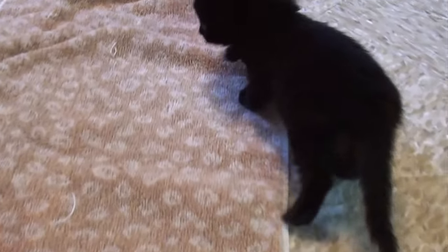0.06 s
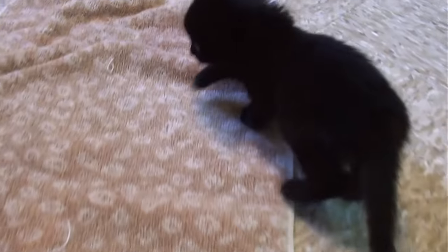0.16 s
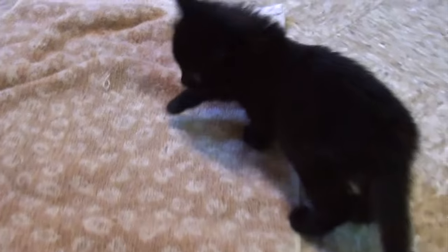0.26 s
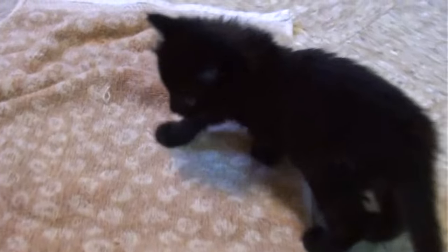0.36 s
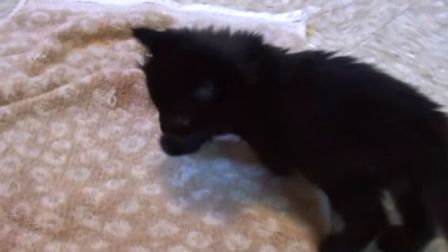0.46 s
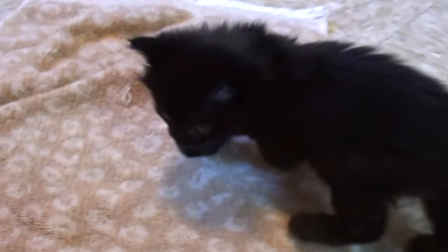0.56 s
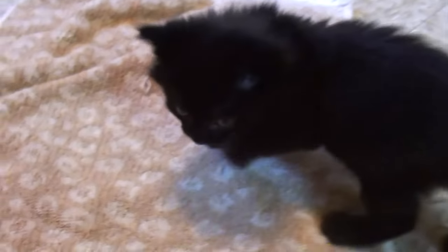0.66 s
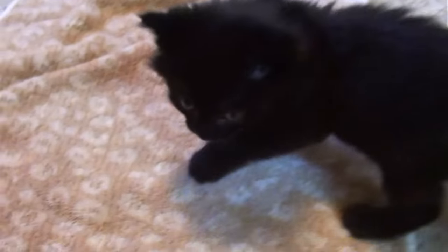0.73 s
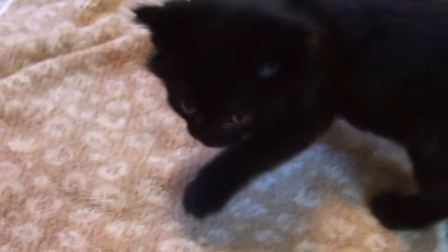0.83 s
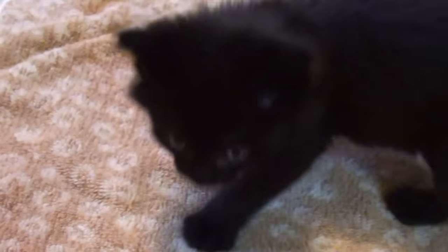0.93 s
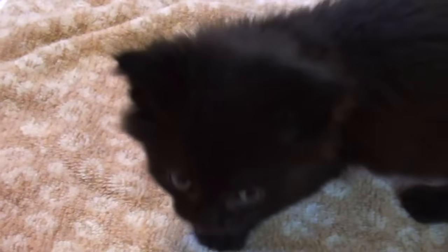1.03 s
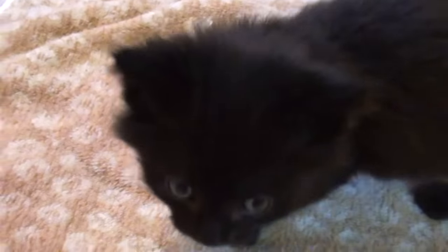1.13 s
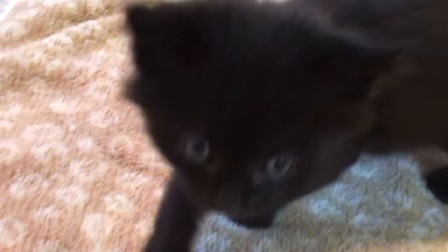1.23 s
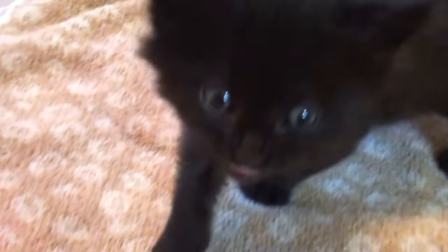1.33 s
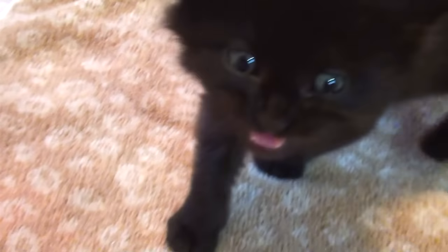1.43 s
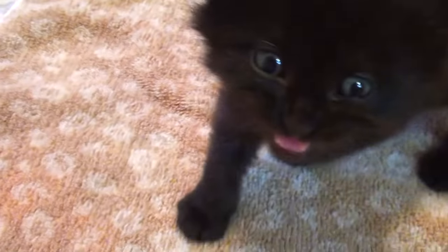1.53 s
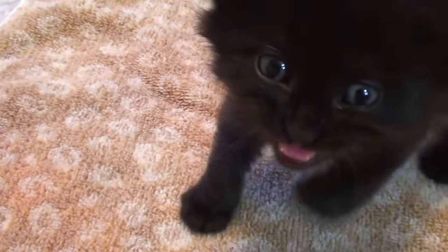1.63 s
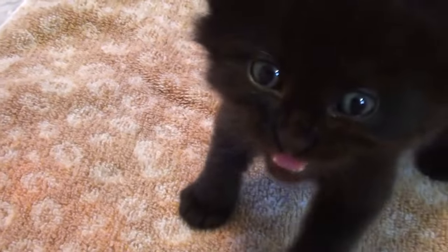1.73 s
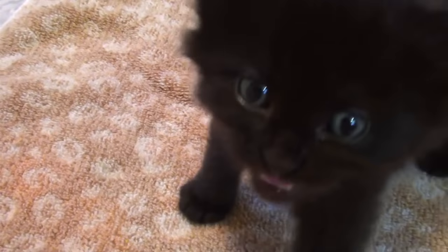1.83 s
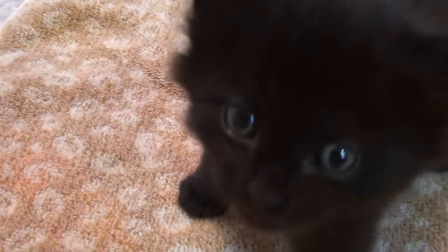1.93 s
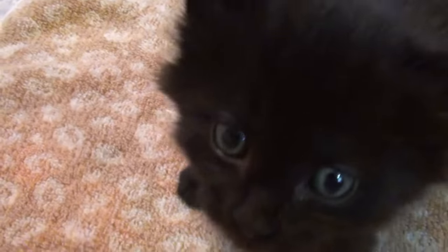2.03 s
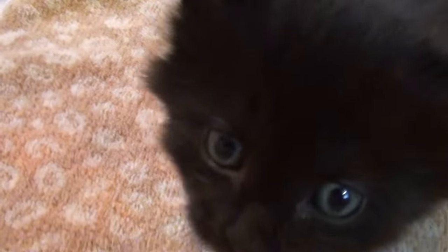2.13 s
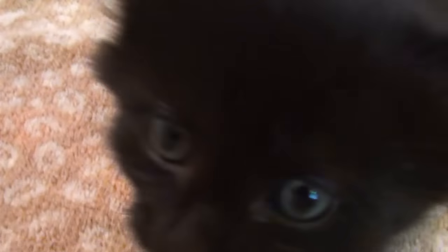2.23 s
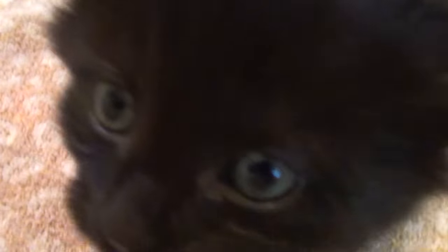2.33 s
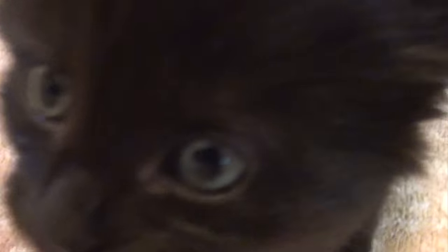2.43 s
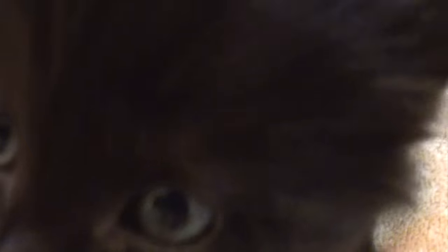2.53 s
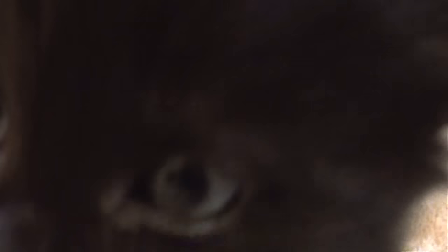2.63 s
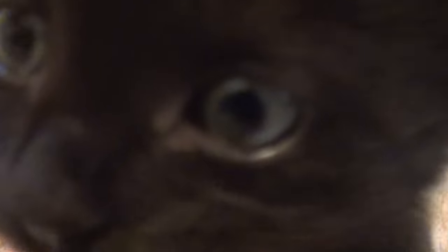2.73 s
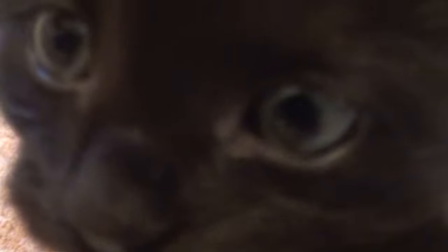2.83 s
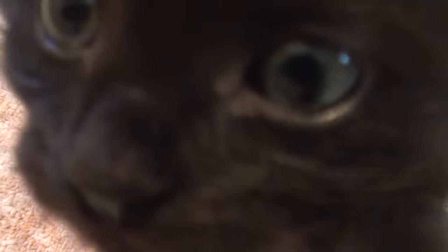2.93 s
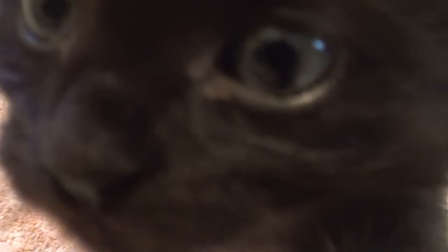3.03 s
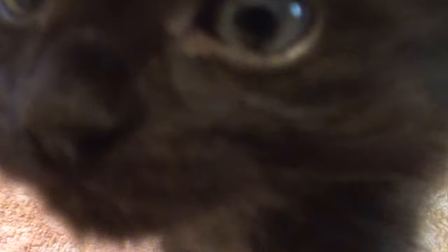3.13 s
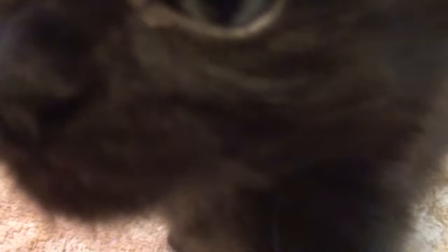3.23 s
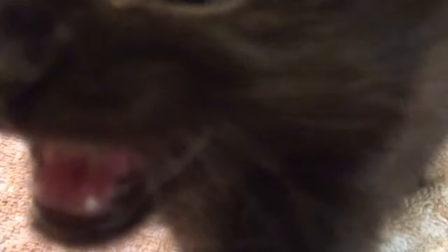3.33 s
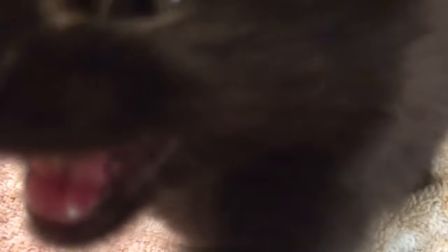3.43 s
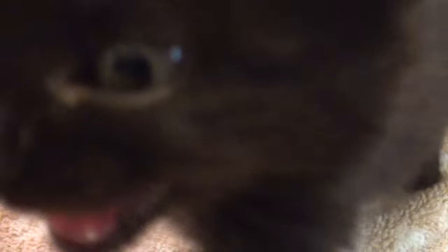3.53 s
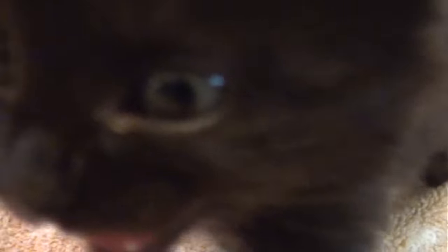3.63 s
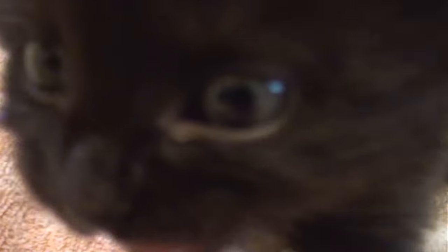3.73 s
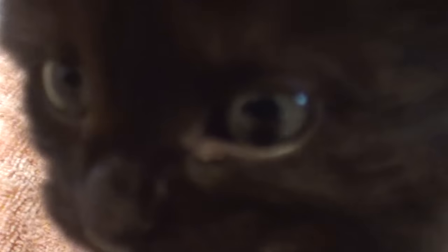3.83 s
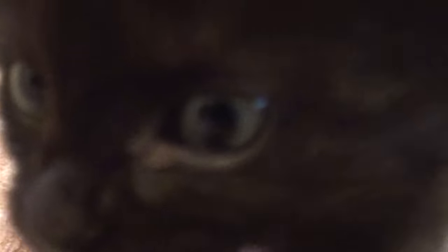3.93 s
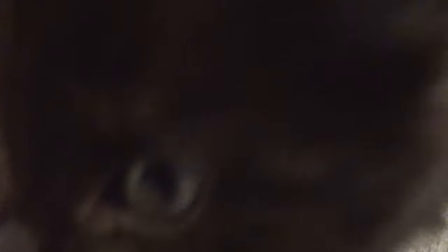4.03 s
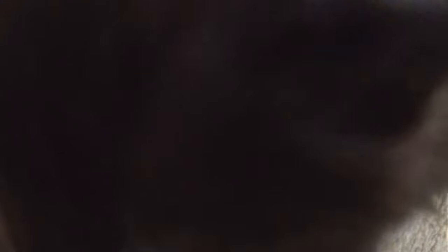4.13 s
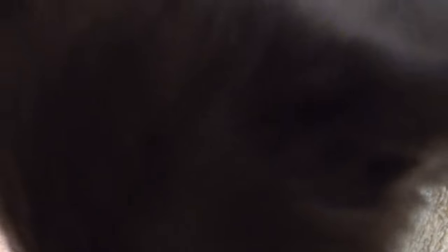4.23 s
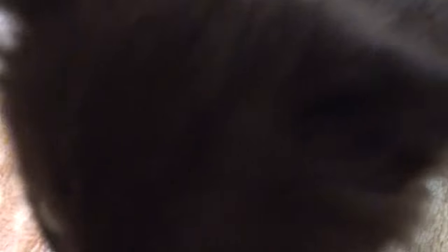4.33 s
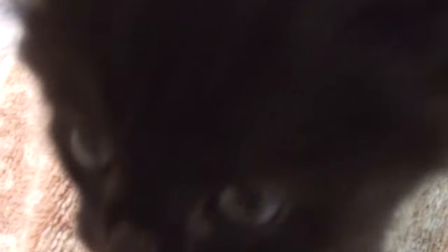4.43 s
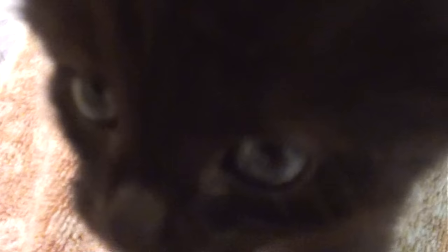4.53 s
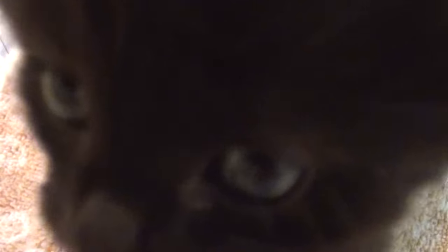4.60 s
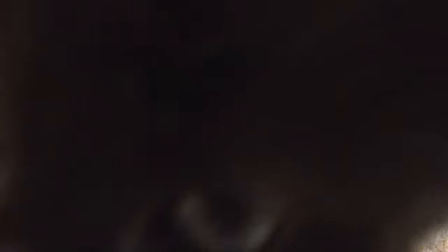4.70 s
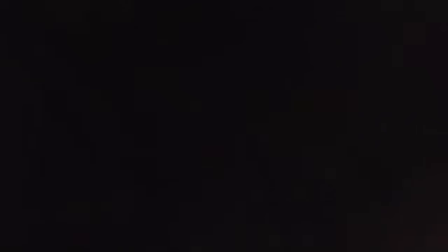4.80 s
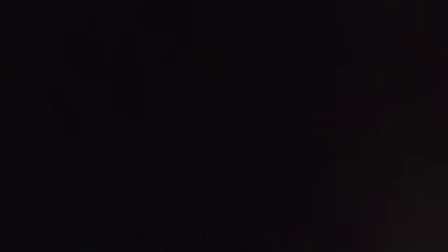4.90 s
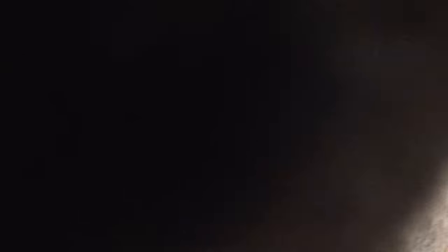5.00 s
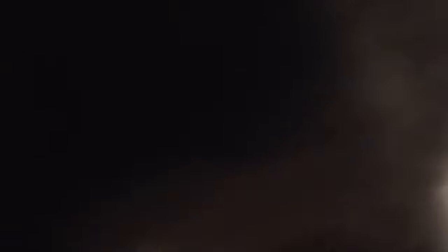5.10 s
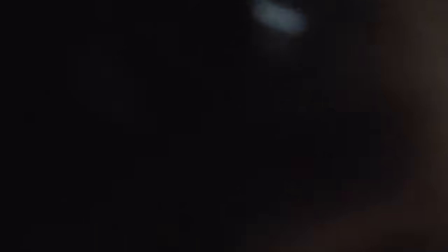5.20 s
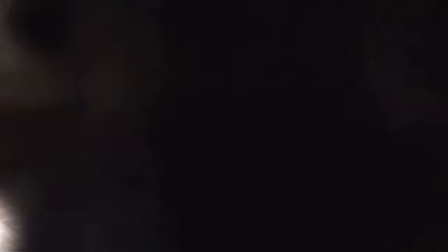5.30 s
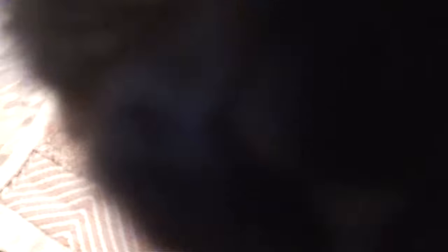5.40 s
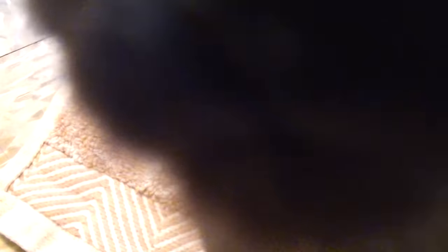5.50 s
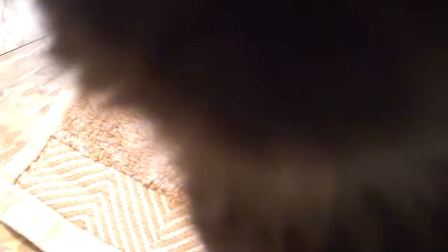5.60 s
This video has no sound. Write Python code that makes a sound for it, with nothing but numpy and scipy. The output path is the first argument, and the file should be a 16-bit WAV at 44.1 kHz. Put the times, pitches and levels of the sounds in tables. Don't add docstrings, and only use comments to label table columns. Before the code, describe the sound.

A small kitten close to a hand-held camera in a quiet carpeted room. A soft handling bump opens over faint rumble and hiss. Around 1.4 seconds a loud, high mew follows tiny mouth ticks; near 3.1 the plastic casing creaks briefly, then a second mew scoops upward, rougher. The ending has a hard short knock, dull bumps and another creak.

```python
import sys
import numpy as np
from scipy import signal
from scipy.fft import rfft, irfft, next_fast_len
from scipy.io import wavfile
from scipy.ndimage import uniform_filter1d

SR = 44100
rng = np.random.default_rng(int(sys.argv[2]) if len(sys.argv) > 2 else 0)


def field_ratio(decibels):
    return 10 ** (np.asarray(decibels, dtype=float) / 20)


def generate_wav(signal):
    frames = np.transpose(np.atleast_2d(signal))
    scaled = np.clip(frames, -1, 1) * 32767
    pcm = np.round(scaled).astype(np.int16)
    wavfile.write(sys.argv[1], SR, pcm)


N = 249466

# [t/s, level/dB]
DRAUGHT = [(0, -0.5), (.9, -2.5), (2.0, 0.1), (2.9, -1), (4.0, 0.26), (5.66, 0.9)]
# [t/s, half length/s, level/dB]
RUMBLE_DIP = (3.574, 0.11, -7.5)
# [f/Hz, level per Hz/dB]
VENT_SPECTRUM = [(15, -34), (40, -12), (80, -5.5), (150, -10.5), (240, -4.5), (380, -4.5), (500, -9),
                 (750, -11), (950, -13), (1300, -18), (2000, -28), (4000, -58)]
# [f/Hz, level per Hz/dB]
HISS_SPECTRUM = [(710, -50), (1200, -2), (1700, -3.5), (2150, -6), (2390, -5), (2610, -6.5), (3440, -3.5),
                 (3880, -6.5), (4380, -4.5), (5700, -7), (7490, -7), (10300, -10), (15100, -11.5),
                 (16000, -12), (16500, -40)]
# [f/Hz, width/Hz, level/dB]
MOTOR_LINES = [(122.2, 5.6, -67), (177, 3.7, -73), (235, 3.5, -64), (262.3, 7.1, -65), (353.8, 4.2, -59),
               (815, 4.6, -70), (882, 3.3, -67), (913, 8.9, -69.5), (962, 0.8, -68), (1002, 3.4, -67.5),
               (1110, 3.5, -72.5)]
# [f/Hz, likeness from 0 to 1]
SIDE_LIKENESS = [(60, 0.99), (130, 0.93), (290, 0.95), (640, 0.58), (1410, 0.18), (3100, 0.6), (6820, 0.91),
                 (15000, 1.0)]
VENT_DB, HISS_DB = -53, -55.5
HISS_FOLLOWS = 0.63

# [t/s, peak level/dB, f/Hz, time to fall 60 dB/s]
BUMPS = [
    (0.056, -32.5, 192, 0.042),
    (.055, -39, 448, 0.095),
    (0.058, -50, 980, 0.036),
    (0.217, -59, 308, 0.051),
    (4.906, -10, 169, 0.0093),
    (4.978, -36, 90, .06),
    (5.07, -30.5, 121, 0.053),
    (5.252, -32, 254, 0.037),
]
# [f/Hz, level/dB, time to fall 60 dB/s]
CASING_MODES = [(292, -7.5, 0.013), (454, -2, 0.0067), (1040, -9.5, 0.0038), (1223, -4, 0.016),
                (2220, -0.5, 0.0055), (2760, -6.5, 0.0093)]
# [f/Hz, time to fall 60 dB/s]
CASING_TREBLE = (7530, 0.0031)
# [first slip t/s, letting go t/s, slip period/s, peak level/dB, letting go level/dB]
CREAKS = [
    (3.0971, 3.1305, .004, -20, -12.5),
    (5.4657, 5.4927, .0038, -15, -12),
]
# [t/s, peak level/dB]
LONE_SLIPS = [
    (3.0888, -28.5),
    (3.1251, -17),
    (3.1318, -17),
    (3.1735, -37),
    (5.2614, -32),
    (5.4437, -29),
]
FIRST_SLIP_DB, SLIP_SPREAD_DB, SLIP_TREBLE_DB = -6, -0.2, -17
SLIP_JITTER = 0.038
HARD_SLIP_DB = -17

# [t/s, peak level/dB, f/Hz, time to fall 60 dB/s]
TICKS = [(0.2195, -33.5, 7950, 0.0026), (1.3363, -27.5, 8400, 0.0032), (1.3407, -39, 8350, 0.004),
         (1.344, -30, 9250, 0.0048), (1.3498, -29.5, 1800, 0.0029), (1.3553, -22.5, 4220, 0.0048),
         (1.3606, -17, 7600, 0.0031), (1.9645, -24, 2010, 0.0024), (2.8371, -30, 7750, 0.0086),
         (3.329, -44, 11120, 0.0034), (3.34, -21, 10700, 0.0043), (3.3446, -11, 10600, 0.005),
         (3.343, -14, 15000, .004), (3.9658, -16, 6300, 0.0019), (3.9672, -14.5, 1600, 0.0014),
         (4.3152, -36.5, 3015, 0.004), (4.3219, -38, 2600, 0.0029), (4.3231, -50, 2050, 0.004),
         (4.8833, -40, 6150, 0.004), (5.06, -29, 3520, 0.0021)]
# [t/s, length/s, level/dB, # centre
# f/Hz, width/Hz]
PUFFS = [(1.358, 0.055, -34.5, 7000, 6060), (1.962, 0.018, -43, 7100, 6030),
         (2.035, 0.012, -54, 6960, 5000), (3.164, 0.017, -54.5, 3480, 5000),
         (3.967, 0.018, -38.5, 6300, 8000), (4.311, 0.021, -53, 5030, 5000),
         (4.563, 0.043, -50.5, 7000, 7000), (4.955, 0.06, -51.5, 8200, 6000),
         (5.007, 0.082, -51, 6100, 9000), (1.39, 0.0091, -29.5, 3420, 5000),
         (5.259, 0.0043, -43, 2440, 794), (5.16, 0.026, -58.5, 8000, 1500), (5.395, .05, -60, 13000, 2500)]

# [t/s, f/Hz]
FOLD_PITCH = [
    [(1.404, 1221), (1.428, 1327), (1.66, 1215), (1.702, 1230), (1.723, 1323), (1.78, 1304), (1.808, 1360),
     (1.875, 1337), (1.907, 1367)],
    [(3.465, 1232), (3.496, 1263), (3.534, 1232), (3.644, 1221), (3.693, 1238), (3.733, 1306), (3.89, 1342),
     (3.911, 1329), (3.927, 1366)],
]
# [t/s, level/dB, mouth resonance f/Hz]
MEWS = [
    [(1.392, -22.5, 5400), (1.41, -14.5, 5500), (1.428, -14.5, 5770), (1.606, -15.5, 5360),
     (1.684, -17, 5220), (1.81, -21, 4780), (1.882, -22.5, 4800), (1.95, -27, 5100), (1.965, -39, 5200)],
    [(3.332, -37.5, 1880), (3.365, -22.5, 3600), (3.41, -15, 5500), (3.478, -14.5, 5520),
     (3.644, -15.5, 5210), (3.754, -16, 4630), (3.85, -17.5, 4530), (3.945, -25, 4790),
     (3.967, -34.5, 4960)],
]
# [scoop up from below/Hz, final droop/Hz, droop length/s, lips shut t/s]
CALL_ENDS = [
    (0, 144, 0.046, 1.959),
    (651.5, 113, 0.051, 3.942),
]
# [octave over fundamental/dB, throat squeezed t/s, squeeze level/dB,
# left-right at start/dB, left-right at end/dB]
CALL_COLOUR = [
    (-5, 1.44, -4.5, -1, -1.3),
    (-0.5, 3.488, -16.5, 1.5, 0.47),
]
# [t/s, slip/Hz, recovery/s, crackle level/dB]
CATCHES = [(1.432, -85.5, 0.0253, -52), (3.398, -19, 0.0061, -38), (1.8, -32, 0.0059, -29),
           (1.825, -50, 0.0074, -41), (1.863, -29, 0.012, -40), (3.442, -29, 0.0099, -45),
           (3.451, -11, 0.0079, -29), (3.473, -38.5, 0.009, -35), (3.514, -18.5, 0.018, -46),
           (3.587, -28.5, 0.0096, -40), (3.653, -7, 0.006, -41), (3.794, -42, 0.013, -31)]
# [t/s, level/dB]
RASP = [(1.39, -24), (1.43, -29), (1.58, -25), (1.66, -28), (1.96, -25), (3.33, -16), (3.37, -22),
        (3.5, -19), (3.55, -22), (3.62, -16), (3.74, -22), (3.83, -23), (3.87, -36), (3.97, -30)]
# [f/Hz, width/Hz, level/dB]
UPPER_THROAT = [(7470, 2740, -9), (11340, 3100, -8.5)]
# [t/s, half length/s, rate/Hz, centre f/Hz, width/Hz]
RATTLE = (3.617, .018, 130, 8100, 710)
MOUTH_WIDTH = 0.67
CLOSING_S, SHUT_MOUTH_DB, SHUT_NOSE_DB, SHUT_OCTAVE_DB, SHUT_BRIGHT_DB = 0.11, -19.5, 16, -3, -6
FUNDAMENTAL_DB, WIDE_HZ, NARROW_DB_PER_KHZ, FUNDAMENTAL_TOP_DB = -20.5, 5500, 8.245, 5
NOSE_TRAP_HZ, NOSE_TRAP_WIDTH_HZ, NOSE_TRAP_DB = 1187, 21, -15
BRIGHT_DB, SQUEEZE_S = -5.5, 0.13
SCOOP_S, SCOOP_FAST_SHARE, SCOOP_OCTAVE_DB = 0.097, 0.55, -9
PARTING_HZ, PARTING_WIDTH_HZ, PARTING_BRIGHT_DB = 273, 166, 25.5
SET_IN_PER_S = 20

ROOM_T60_S, ROOM_DB, WALL_CUT_HZ = 0.37, -25, 8000


def rms_one(x):
    return x / np.sqrt(np.mean(x ** 2) + 1e-20)


def in_time(rows, t):
    s, *columns = np.transpose(rows)
    return [np.interp(t, s, c) for c in columns]


def at_hz(points, hz):
    known_hz, value = np.array(points).T
    return np.interp(np.log(hz), np.log(known_hz), value)


def drift(rate, size=N):
    r = np.exp(-2 * np.pi * rate / SR)
    white = rng.standard_normal(size + 9000)
    return rms_one(signal.lfilter([1], [1, -2 * r, r * r], white)[9000:])


def resonate(x, hz, width_hz):
    r = np.exp(-np.pi * width_hz / SR)
    turn = np.cos(2 * np.pi * hz / SR)
    return signal.lfilter([1 - r * r, 0, r * r - 1], [2, -4 * r * turn, 2 * r * r], x)


def pole(hz, centre_hz, width_hz):
    return 1j * hz * width_hz / (centre_hz ** 2 - hz ** 2 + 1j * hz * width_hz)


def ring(hz, t60, size=2048):
    t = np.arange(size) / SR
    return np.sin(2 * np.pi * hz * t) * field_ratio(-60 * t / t60)


def add(out, s, piece):
    i = round(s * SR)
    out[..., i:i + piece.shape[-1]] += piece[..., :N - i]


def stereo_noise(spectrum, patchy_db):
    hz = np.maximum(np.fft.rfftfreq(N, 1 / SR), 1)
    alike = np.clip(at_hz(SIDE_LIKENESS, hz), 0, 0.999)
    mid, side = rfft(rng.standard_normal((2, N))) * field_ratio(at_hz(spectrum, hz))
    both = np.sqrt(1 + alike) * mid + np.sqrt(1 - alike) * side * [[1], [-1]]
    stripe = np.cos(np.pi * np.log2(hz)) ** 2
    patches = [irfft(both * share, N) * field_ratio(patchy_db * drift(24)) for share in (stripe, 1 - stripe)]
    return rms_one(sum(patches))


def background():
    t = np.arange(N) / SR
    air_db, = in_time(DRAUGHT, t)
    at, half, dip_db = RUMBLE_DIP
    vent_db = VENT_DB + air_db + dip_db * np.exp(-((t - at) / half) ** 2)
    hiss_db = HISS_DB + HISS_FOLLOWS * air_db
    white = rng.standard_normal(N)
    hum = sum(field_ratio(db) * rms_one(resonate(white, hz, width_hz)) for hz, width_hz, db in MOTOR_LINES)
    flutter = 1 + 0.08 * np.cos(2 * np.pi * 60 * t) + 0.06 * np.cos(2 * np.pi * 120 * t)
    vent = field_ratio(vent_db) * stereo_noise(VENT_SPECTRUM, 1.0)
    hiss = field_ratio(hiss_db) * flutter * stereo_noise(HISS_SPECTRUM, 1.0)
    return vent + hum + hiss


def slips():
    rows = list(LONE_SLIPS)
    count = np.arange(16)
    for start, end, period, peak_db, last_db in CREAKS:
        late, size = rng.standard_normal((2, 16))
        s = start + period * (count + SLIP_JITTER * late * (count > 0))
        db = peak_db + SLIP_SPREAD_DB * size + FIRST_SLIP_DB * (count == 0)
        run = list(zip(s, db))[:int((end - start) / period)]
        rows += run + [(end, last_db)]
    return rows


def casing_rings():
    rings = np.zeros(2048)
    for k, (hz, db, t60) in enumerate(CASING_MODES):
        level_chance, pitch_chance = rng.standard_normal(2)
        sign = 1 if k < 2 else -1
        rings += sign * field_ratio(db + 1.5 * level_chance) * ring(hz * (1 + 0.04 * pitch_chance), t60)
    return rings / np.abs(rings).max()


def camera_body():
    body, direct = np.zeros(N), np.zeros(N)
    for s, peak_db in slips():
        way = np.sign(peak_db - HARD_SLIP_DB)
        add(body, s - 0.0002, way * field_ratio(peak_db) * casing_rings())
        treble_db = peak_db + SLIP_TREBLE_DB + 6.5 * rng.standard_normal()
        add(direct, s, field_ratio(treble_db) * ring(*CASING_TREBLE))
    for s, peak_db, hz, t60 in BUMPS:
        soft = 1 - np.exp(-np.arange(8192) / SR * hz * 3.0)
        push = field_ratio(peak_db) * soft * ring(hz, t60, size=8192)
        add(direct, s, signal.lfilter(*signal.butter(2, 2 * hz, fs=SR), push))
    contact = signal.butter(3, [190, 3300], "band", fs=SR, output="sos")
    return signal.sosfilt(contact, body + 1e-18) + direct


def smacks(out):
    for s, peak_db, hz, t60 in TICKS:
        fall = field_ratio(-60 * np.arange(2048) / SR / t60)
        snap = resonate(rng.standard_normal(2048), 2500, 13000) * fall
        tick = signal.lfilter(*signal.butter(3, 13500, fs=SR), 0.6 * snap - ring(hz, t60))
        add(out, s, field_ratio(peak_db) * tick)


def puffs(out):
    for s, length, db, hz, width_hz in PUFFS:
        size = round(length * SR)
        air = resonate(resonate(rng.standard_normal(8192), hz, width_hz), hz, width_hz)
        dull = signal.butter(6, max(12000, hz + 1500), fs=SR, output="sos")
        lumpy = signal.sosfilt(dull, air)[:size] * field_ratio(2.5 * drift(90, size=size))
        swell = np.sin(np.pi * np.arange(size) / size) ** 0.48
        add(out, s, field_ratio(db) * rms_one(lumpy) * swell)


def mew(rows, pitches, ends, colour):
    t = np.arange(rows[0][0], rows[-1][0], 1 / SR)
    size = len(t)
    effort_db, mouth_hz = in_time(rows, t)
    scoop_hz, droop_hz, droop_s, shut_s = ends
    over_db, squeeze_at, squeeze_db, pan_from_db, pan_to_db = colour

    left = np.maximum(1 - (t - t[0]) / SCOOP_S, 0)
    scoop = scoop_hz * (SCOOP_FAST_SHARE * left ** 3 + (1 - SCOOP_FAST_SHARE) * left)
    droop = droop_hz * np.maximum(1 - (t[-1] - t) / droop_s, 0) ** 2
    pitch = in_time(pitches, t)[0] - scoop - droop

    shut = np.clip(1 - (shut_s - t) / CLOSING_S, 0, 1) ** 1.52
    narrow_db = FUNDAMENTAL_DB + NARROW_DB_PER_KHZ * (WIDE_HZ - mouth_hz) / 1000
    low_db = effort_db + np.minimum(narrow_db, FUNDAMENTAL_TOP_DB) + SHUT_NOSE_DB * shut
    first_db = low_db + NOSE_TRAP_DB * np.exp(-((pitch - NOSE_TRAP_HZ) / NOSE_TRAP_WIDTH_HZ) ** 2)
    octave_db = low_db + over_db + SHUT_OCTAVE_DB * shut + SCOOP_OCTAVE_DB * np.tanh((scoop / 170) ** 4)
    mouth_db = effort_db + SHUT_MOUTH_DB * shut ** 2.7
    squeeze = np.exp(-((t - squeeze_at) / SQUEEZE_S) ** 2)
    bright_db = BRIGHT_DB + SHUT_BRIGHT_DB * shut + squeeze_db * squeeze
    flare_db = PARTING_BRIGHT_DB * np.exp(-((scoop - PARTING_HZ) / PARTING_WIDTH_HZ) ** 2)

    loose = field_ratio(in_time(RASP, t)[0] + 1.5 * drift(30, size=size))
    crackle = np.zeros(size)
    for s, slip_hz, recovery, crackle_db in CATCHES:
        since = np.maximum(t - s, 0)
        set_in = 1 - np.exp(-since / (SET_IN_PER_S * recovery ** 2))
        pitch += slip_hz * set_in * np.exp(-since / recovery)
        crackle += field_ratio(crackle_db) * np.exp(-((t - s) / 0.0031) ** 2)
    jitter = 0.065 * drift(90, size=size) + 0.04 * drift(400, size=size)
    pitch *= 1 + 0.002 * drift(40, size=size) + loose * jitter
    phase = 2 * np.pi * np.cumsum(uniform_filter1d(pitch, size=66)) / SR

    order = np.arange(3, 24)[:, None]
    hz = order * pitch
    mouth = pole(hz, mouth_hz, MOUTH_WIDTH * mouth_hz)
    upper = np.zeros(hz.shape)
    for centre_hz, width_hz, db in UPPER_THROAT:
        flare = flare_db * (centre_hz < 9000)
        upper += field_ratio(db + flare) * np.abs(pole(hz, centre_hz, width_hz)) ** 2
    top_fall = (1 / (1 + (hz / 12400) ** 22) + 0.058) * (hz < 16000)
    throat = (np.abs(mouth) ** 3 + field_ratio(bright_db) * upper) * top_fall
    throat /= np.sqrt(np.sum(throat ** 2, axis=0))
    at, half, rate_hz, centre_hz, width_hz = RATTLE
    depth = 1.2 * np.exp(-((t - at) / half) ** 4 - ((hz - centre_hz) / width_hz) ** 2)
    throat *= 1 - depth * np.cos(np.pi * rate_hz * t + 0.89 * drift(40.7, size=size)) ** 2

    lag = 0.35 * np.angle(mouth)
    slow = field_ratio(0.84 * np.array([drift(42, size=size) for k in order]))
    shake = 1 + 0.8 * loose * np.array([drift(600, size=size) for k in order])
    voice = field_ratio(mouth_db) * np.sum(slow * shake * throat * np.cos(order * phase + lag), axis=0)
    voice += field_ratio(first_db) * np.cos(phase + 0.5) + field_ratio(octave_db) * np.cos(2 * phase + 0.5)

    white = rng.standard_normal(size) * (1 + 0.5 * np.cos(phase))
    air = rms_one(resonate(resonate(white, 6900, 4500), 6900, 4500) + 0.15 * resonate(white, 14000, 5700))
    air = signal.sosfilt(signal.butter(3, [3200, 12000], "band", fs=SR, output="sos"), air)
    low_air = rms_one(resonate(resonate(white, 3100, 3500), 3100, 3500))
    breath = 0.84 * field_ratio(mouth_db) * loose * air + crackle * (0.9 * air + 0.5 * low_air)

    edge = np.minimum(1, np.minimum(t - t[0], t[-1] - t) / 0.0011)
    pan_db = np.linspace(pan_from_db, pan_to_db, size)
    return (breath - np.sqrt(2) * voice) * edge * field_ratio(pan_db * np.array([[0.5], [-0.5]]))


def kitten():
    out = np.zeros((2, N))
    smacks(out)
    puffs(out)
    for rows, pitches, ends, colour in zip(MEWS, FOLD_PITCH, CALL_ENDS, CALL_COLOUR):
        add(out, rows[0][0], mew(rows, pitches, ends, colour))
    return out


def room(x):
    t = np.arange(round(0.5 * SR)) / SR
    tail = rng.standard_normal((2, len(t))) * field_ratio(-60 * t / ROOM_T60_S) * (t > 0.004)
    tail = signal.lfilter(*signal.butter(2, WALL_CUT_HZ, fs=SR), tail)
    tail /= np.sqrt(np.sum(tail ** 2, axis=1, keepdims=True))
    return field_ratio(ROOM_DB) * signal.fftconvolve(x, tail, axes=1)[:, :N]


def port_shift(x, side_db):
    quarter_turn = signal.hilbert(x, next_fast_len(N))[..., :N].imag
    return x + field_ratio(side_db) * quarter_turn * [[1], [-1]]


def scene():
    cat = kitten()
    casing = port_shift(camera_body(), side_db=-18)
    return port_shift(cat, side_db=-24) + room(cat) + casing + background()


def band_limit(x):
    return signal.sosfilt(signal.butter(12, 16830, fs=SR, output="sos"), x)


def record(dry):
    level = uniform_filter1d(np.mean(dry ** 2, axis=0), 4410)
    gain = 1 / (1 + np.sqrt(np.maximum(level, 0)) / 1.9)
    top_cut = signal.cheby2(14, 50, 16200, fs=SR, output="sos")
    mix = signal.sosfilt(top_cut, dry * gain)
    return band_limit(mix)


dry = scene()
out = record(dry)
generate_wav(out)
```